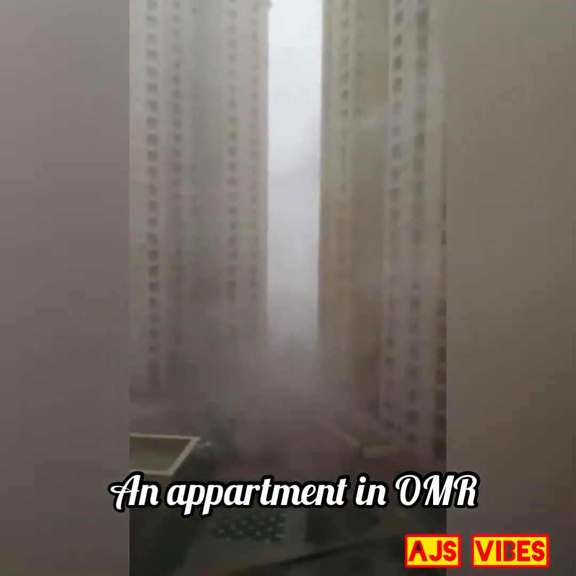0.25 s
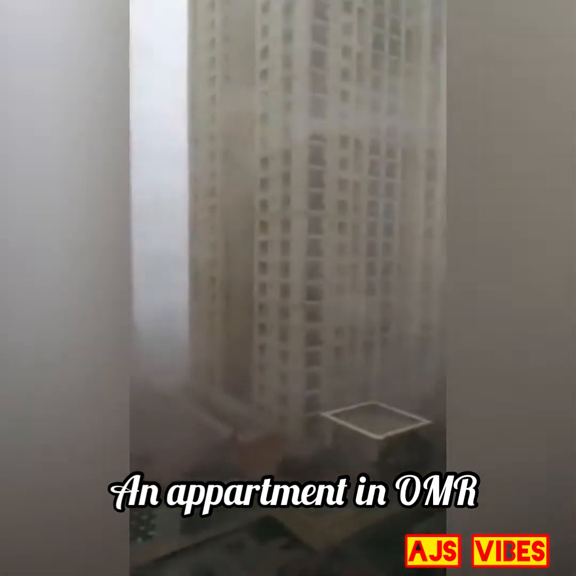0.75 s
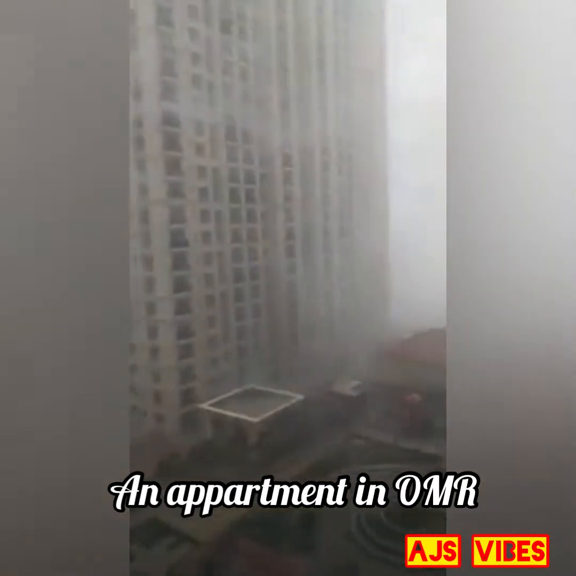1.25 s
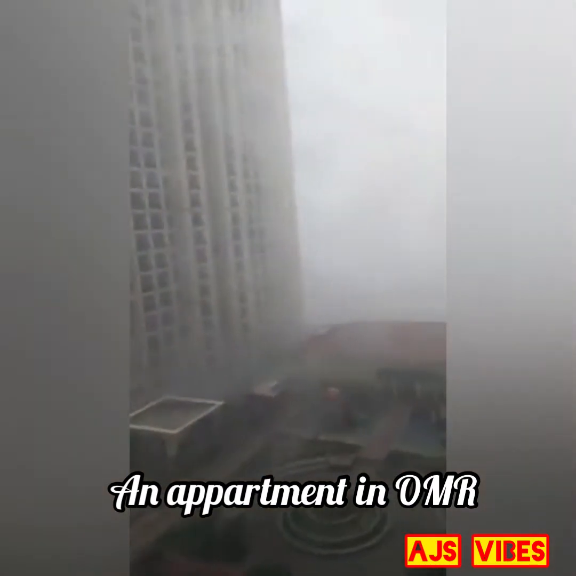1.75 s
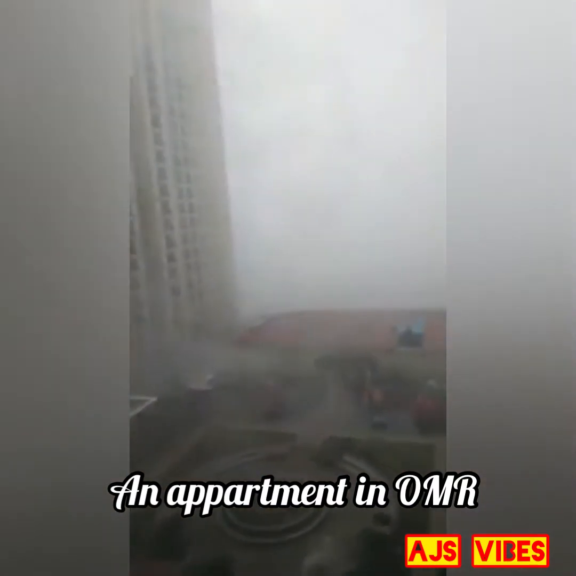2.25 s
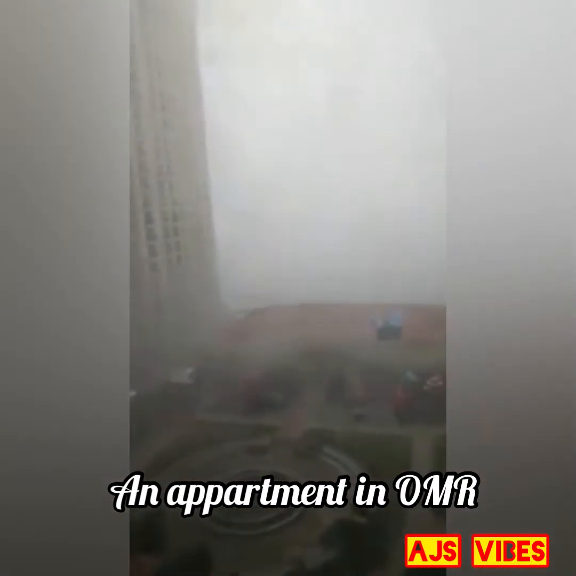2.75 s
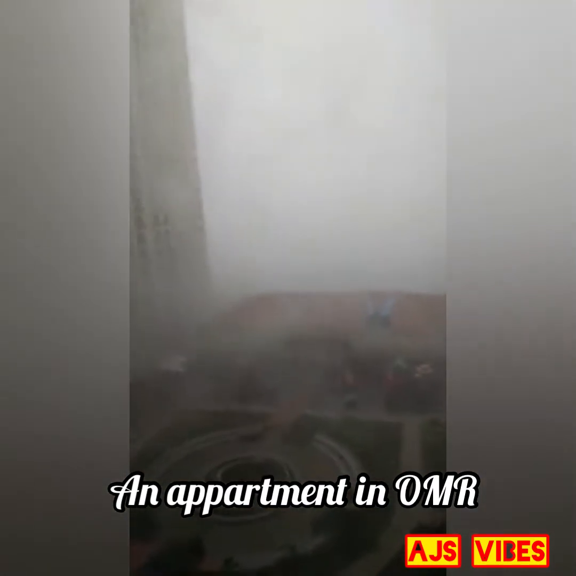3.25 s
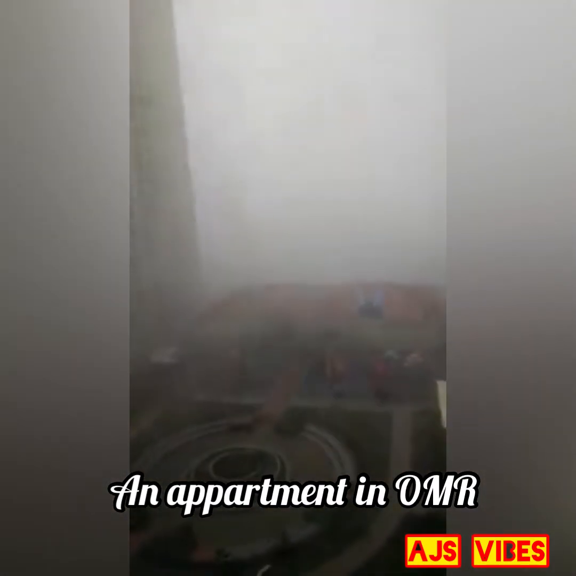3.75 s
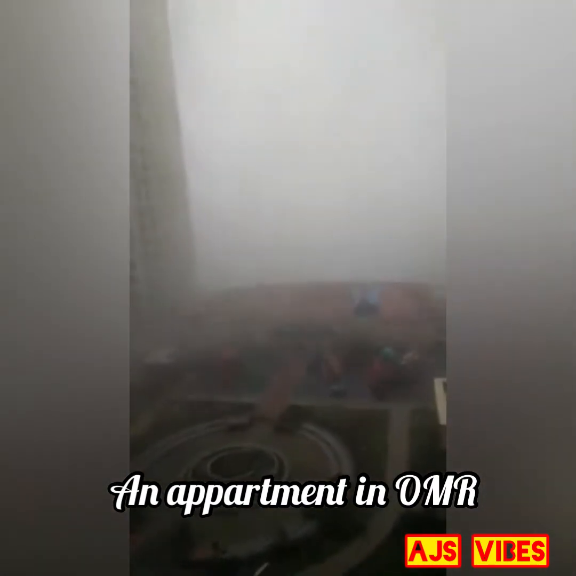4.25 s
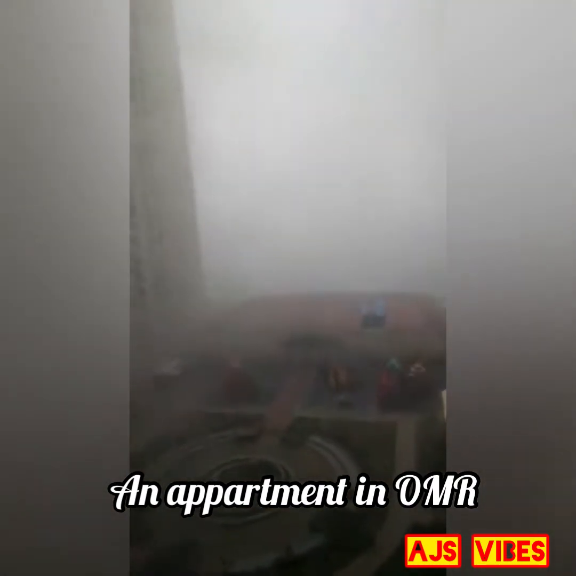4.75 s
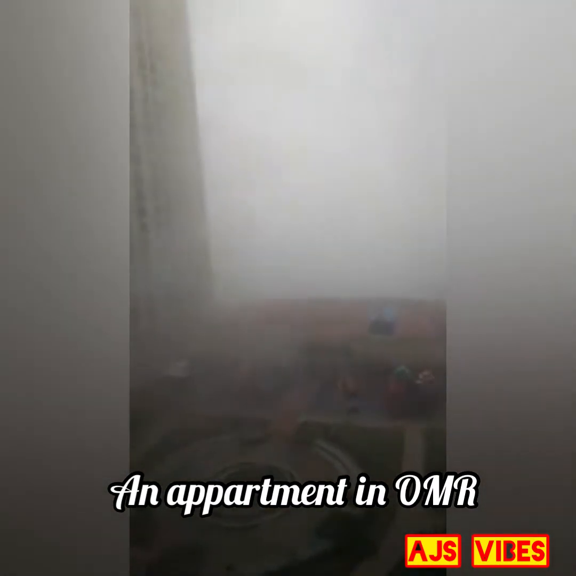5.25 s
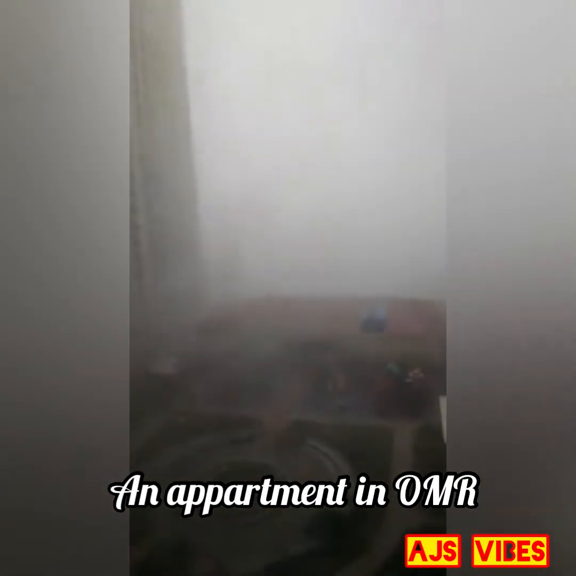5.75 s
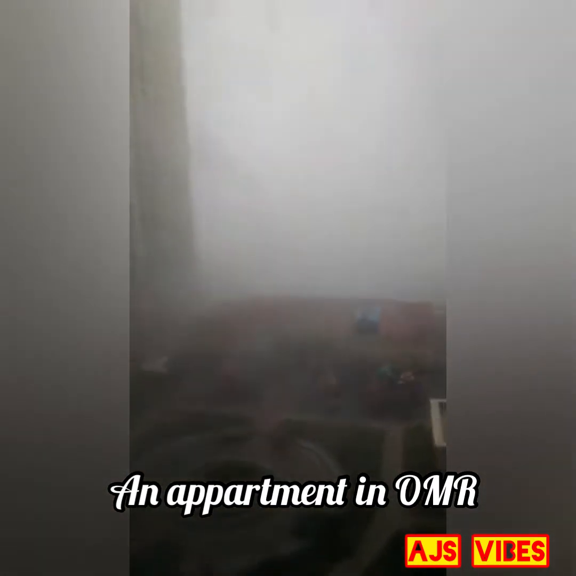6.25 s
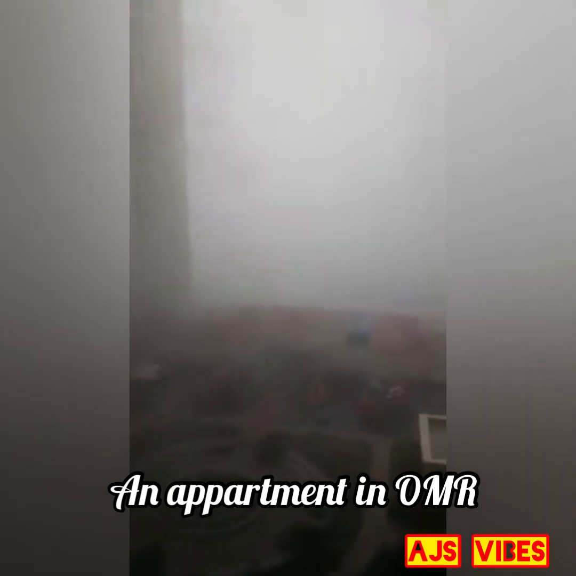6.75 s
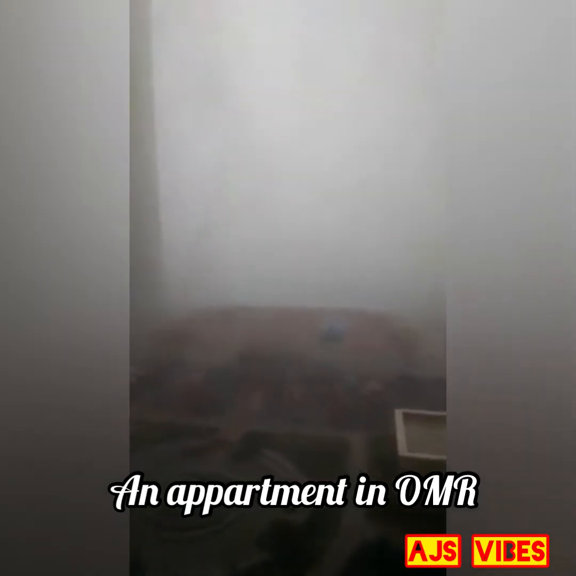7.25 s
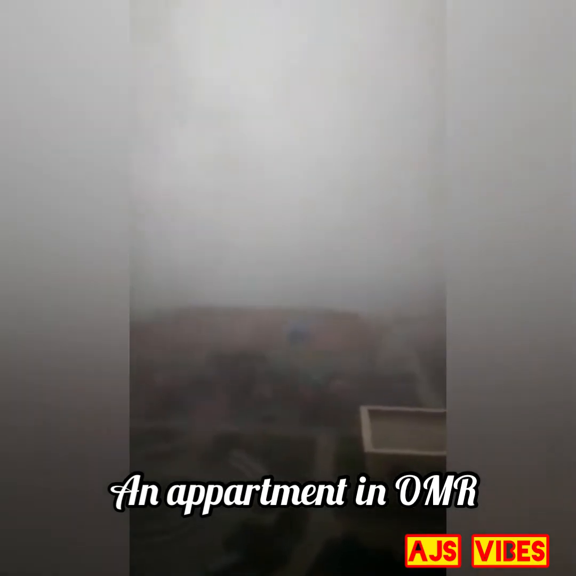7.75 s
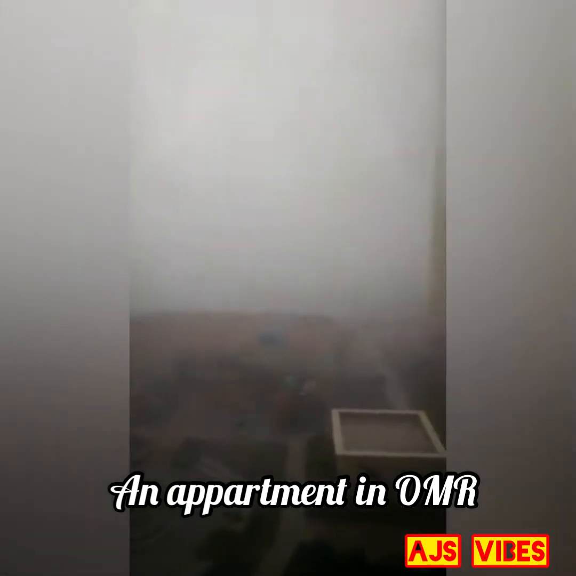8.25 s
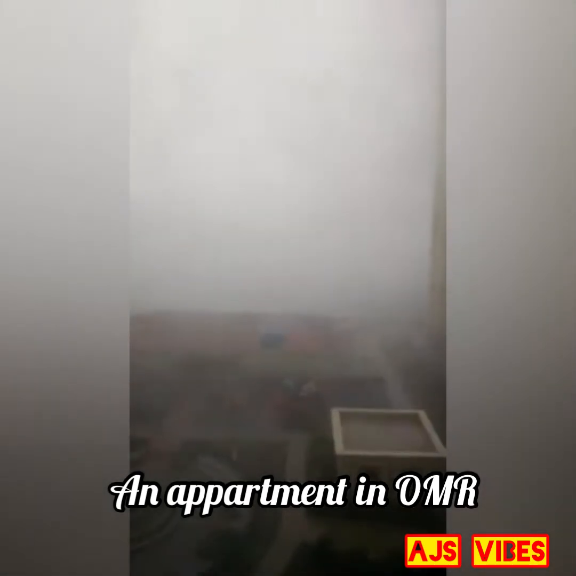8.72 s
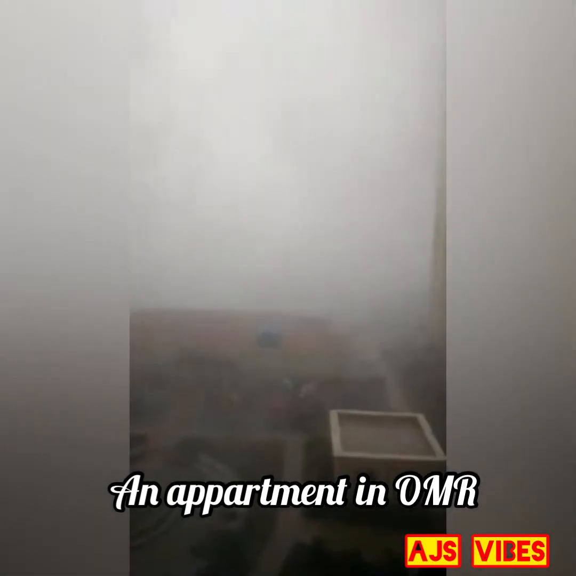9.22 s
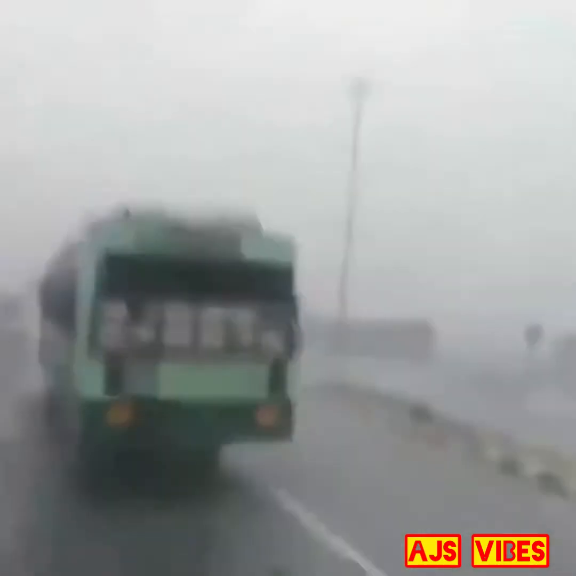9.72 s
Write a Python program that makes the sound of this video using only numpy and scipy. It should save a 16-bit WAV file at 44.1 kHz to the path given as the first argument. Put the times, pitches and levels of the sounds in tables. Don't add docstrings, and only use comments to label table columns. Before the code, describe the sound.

Dense driven rain roars and hisses around high-rise towers while wind gusts thump a phone's microphone, then a cut to a wet road fading in.

```python
import sys
import numpy as np
from scipy import signal
from scipy.fft import rfft, irfft, next_fast_len
from scipy.io import wavfile
from scipy.ndimage import uniform_filter1d

SR = 44100
rng = np.random.default_rng(int(sys.argv[2]) if len(sys.argv) > 2 else 0)


def log_audio(samples):
    frames = np.atleast_2d(samples).T
    limited = np.clip(frames, -1, 1)
    pcm = np.round(limited * 32767).astype(np.int16)
    wavfile.write(sys.argv[1], SR, pcm)


def how_loud(loudness_db):
    steps = np.asarray(loudness_db, float) / 20
    return 10 ** steps


N = 440115
FFT_SIZE = next_fast_len(N, real=True) // 2 * 2
HZ = np.arange(FFT_SIZE // 2 + 1) * SR / FFT_SIZE + 1e-3
NOTCH_HZ = 2591


def on_hz(table):
    hz, db = np.transpose(table)
    return how_loud(np.interp(np.log(HZ), np.log(hz), db))


def noise(gain):
    return irfft(rfft(rng.standard_normal(FFT_SIZE)) * gain)[:N] * np.sqrt(SR / 2)


def unit(x):
    return x / np.sqrt(np.mean(x ** 2))


def walk(rate):
    k = int(SR / rate)
    steps = np.repeat(rng.standard_normal(N // k + 1), k)
    return unit(uniform_filter1d(uniform_filter1d(steps, k), k)[:N])


def even(x, span_s):
    return x / np.sqrt(uniform_filter1d(x ** 2, int(span_s * SR)) + 1e-12)


# frequency in Hz, density in dB per Hz.
RAIN_SPECTRUM = [(20, -65.5), (50, -57), (300, -56), (600, -62), (1300, -63.5), (2000, -66.5),
                 (2650, -63.5), (4000, -69.5), (5700, -62.5), (7200, -85.5), (8150, -74), (8500, -79),
                 (13000, -88.5), (16000, -100)]
# time in seconds, level in dB.
MIST_LEVEL = [(0, -2.5), (1.3, -2.5), (1.6, 1), (2.2, -1), (2.5, 0.5), (3.0, 2), (3.3, -1), (5.0, -1),
              (5.5, 1), (5.95, 0), (6.1, 5), (6.7, 5), (7.1, 0), (9.45, -1)]


def rain(hiss_db, roar_db, bass_db):
    t = np.arange(N) / SR
    port_gap_m = 0.16
    like = np.clip(np.sinc(2 * HZ * port_gap_m / 343), -1, .9995)
    patter = how_loud(rng.exponential(size=N))
    both, apart = (rfft(unit(rng.standard_normal(N) * patter), FFT_SIZE) for _ in range(2))
    both, apart = both * np.sqrt((1 + like) / 2), apart * np.sqrt((1 - like) / 2)
    ports = np.array([both + apart, both - apart])
    colour, out, sheets = on_hz(RAIN_SPECTRUM) * np.sqrt(SR / 2), 0, walk(6)
    for hz in 22 * 2 ** np.arange(0, 10, .5):
        band = colour * np.cos(np.pi * np.clip(np.log2(HZ / hz), -.5, .5))
        low = 1 / (1 + (hz / 2200) ** 4) / (1 + (120 / hz) ** 2)
        db = hiss_db + 25.5 + (3.0 + bass_db) / (1 + (hz / 160) ** 2) + low * roar_db
        db = db + 0.65 * sheets + 0.94 * walk(15)
        db = db + (hz > 13000) * np.interp(t, *np.transpose(MIST_LEVEL))
        out = out + how_loud(db) * irfft(band * ports)[:, :N]
    return out


# frequency in Hz, density in dB per Hz.
EDDY_SPECTRUM = [(15, -36), (30, -14), (60, -16), (150, -12), (300, -17.5), (500, -17.5), (1000, -44),
                 (2000, -61), (8000, -83)]


def buffeting(level_db):
    size = np.sqrt(np.clip(how_loud(level_db) ** 2 - how_loud(-31) ** 2, 0, 1)) * how_loud(-10.5)
    lumps = how_loud(3.0 * walk(40) + 2.4 * walk(12))
    return np.array([size * unit(lumps * noise(on_hz(EDDY_SPECTRUM))) * how_loud(db) for db in (1.5, -1.5)])


# centre in seconds, level in dB, length in seconds, flutter over thump in dB.
GUST_EVENTS = [(2.441, -17, 0.018, -2), (2.523, -13.5, 0.018, -5), (2.641, -13, 0.01, -16),
               (2.717, -10, 0.012, -8), (2.834, -14, 0.028, -1), (2.884, -5, 0.016, -9),
               (2.939, -9.5, 0.021, -4), (3.105, -18, 0.023, -5.5), (3.656, -12.5, 0.053, -3.5),
               (3.728, -13.5, 0.021, 0.5), (4.067, -14, 0.024, -12), (4.507, -15, 0.02, -3.5),
               (4.55, -12.5, 0.028, -11), (4.807, -15, 0.022, -15), (4.864, -7, 0.032, -4.5),
               (5.03, -17.5, .03, -3), (6.01, -2.5, 0.024, -16), (6.062, -4, 0.031, -8),
               (6.14, -13, 0.029, -4), (6.29, -14, 0.018, -6.5), (6.599, -15, .015, -1.2),
               (7.132, -18, .02, -5), (7.42, -8.5, 0.019, -7.5), (7.94, -17, 0.024, -4.5),
               (8.102, -16, 0.04, -2), (8.56, -12, 0.013, -5), (8.625, -16, 0.017, -0.5),
               (8.876, -14, 0.045, -7), (8.947, -11, 0.019, -5), (9.367, -17, 0.031, -5)]
# frequency in Hz, density in dB per Hz.
THUMP_SPECTRUM = [(12, -36), (30, -7.5), (60, 1), (150, 1.5), (220, -16), (500, -22.5), (4000, -80)]
# frequency in Hz, density in dB per Hz.
FLUTTER_SPECTRUM = [(80, -27), (180, 0.5), (300, 2), (500, -6.5), (1000, -24), (2000, -30.5), (8000, -82.5)]


def gusts():
    thump = even(noise(on_hz(THUMP_SPECTRUM)), 0.026)
    flutter = even(noise(on_hz(FLUTTER_SPECTRUM)), 0.0057)
    out, port = np.zeros((2, N)), rng.integers(0, 2, len(GUST_EVENTS))
    for k, (s, db, length, flutter_db) in zip(port, GUST_EVENTS):
        i = np.arange(int((s - .08) * SR), int((s + 0.11) * SR))
        swell = how_loud(db) * np.exp(-((i / SR - s) / (0.95 * length)) ** 2)
        deep = np.sqrt(max(1 - how_loud(flutter_db) ** 2, .05))
        out[k, i] += swell * (deep * how_loud(-13.5) * thump[i] + how_loud(flutter_db - 2.0) * flutter[i])
    return out


# centre in seconds, left peak, right peak, half width in seconds.
SLAM_EVENTS = [
    (2.9238, 1.04, -.55, .0009),
    (6.049, 1.03, -.65, .0016),
    (8.6245, 1.04, -.8, .0008),
]


def slammed(x):
    t = np.arange(N) / SR
    for s, left, right, half_s in SLAM_EVENTS:
        push = np.exp(-((t - s) / half_s) ** 2)
        x = x * (1 - push) + push * np.array([[left], [right]])
    return x


# time in seconds, peak in dB, ring in Hz.
RATTLE_EVENTS = [(1.276, -10, 2250), (1.298, -11, 2300), (1.312, -12, 1800), (1.336, -12, 2200),
                 (1.356, -13, 1700), (1.38, -13, 2200), (1.405, -14, 1900), (1.428, -12, 1700),
                 (1.452, -12, 2300), (1.57, -9, 1400), (1.59, -11, 1700), (1.612, -11, 1500),
                 (1.584, -5.5, 850), (1.604, -4.5, 1070), (1.836, -14, 1990), (1.907, -18, 2030),
                 (1.974, -15, 2000), (2.071, -17, 1970), (2.271, -7, 1300), (2.288, -10, 1200),
                 (2.306, -7.5, 1100), (2.356, -6, 1210), (2.372, -6.5, 1000), (3.28, -13, 1980),
                 (3.539, -13, 1950), (3.548, -14, 1960), (4.841, -18, 1840), (4.838, -10.5, 760),
                 (4.849, -14, 1500)]


def rattle():
    out, t = np.zeros(N), np.arange(4000) / SR
    shake_s, rise_s = 0.013, 0.0027
    slap = signal.butter(2, [250, 3600], "bandpass", fs=SR, output="sos")
    for s, db, hz in RATTLE_EVENTS:
        blows = 0.5 + (rng.random(len(t)) < .03) * 1.4
        hits = rng.standard_normal(len(t)) * blows * np.exp(-t / shake_s) * (1 - np.exp(-t / rise_s))
        hits[130] += 3.0
        body = signal.butter(2, [hz - 480, hz + 450], "bandpass", fs=SR, output="sos")
        ring = signal.sosfilt(body, hits)
        ring = ring + 0.28 * signal.sosfilt(slap, hits)
        i = int((s - .003) * SR)
        out[i:i + len(t)] += how_loud(db - 4.5) * ring / np.abs(ring).max()
    return np.array([0.66 * out, out])


# time in seconds, peak in dB, ring in Hz.
TAP_EVENTS = [(1.284, -4.5, 2120), (1.2957, -15, 1920), (1.3007, -9.5, 2000), (1.3083, -8, 2200),
              (1.322, -5.5, 2120), (1.3327, -12.5, 2020), (1.3407, -8, 2040), (1.3619, -11, 2040),
              (1.3735, -9, 1970), (1.3855, -6.5, 2130), (1.4, -15, 2090), (1.4121, -10, 2020),
              (1.4217, -13.0, 2140), (1.4272, -15, 2190), (1.434, -9.5, 2100), (1.4458, -3.5, 2090),
              (1.4589, -10.5, 2060), (1.4684, -11, 2170), (1.4821, -13.5, 2160), (1.5746, -1.5, 2070),
              (1.5827, -12.5, 2070), (1.5941, -11, 2050), (1.6043, -10.5, 1980), (1.6131, -11, 2190),
              (1.6203, -16, 1980), (1.6291, -13.9, 2170)]
# time in seconds, peak in dB, ring in Hz.
LATE_TAP_EVENTS = [
    (1.8405, -11, 2020),
    (1.91, -13, 1950),
    (2.033, -13.5, 2100),
    (2.074, -13.5, 1950),
]


def taps():
    out, t = np.zeros(N), np.arange(1200) / SR
    peak_s = 0.0017
    shape = t / peak_s * np.exp(1 - t / peak_s)
    slap = signal.butter(3, [1100, 2900], "bandpass", fs=SR, output="sos")
    for s, db, hz in list(TAP_EVENTS) + list(LATE_TAP_EVENTS):
        ring = np.sin(2 * np.pi * (hz * t + rng.random()))
        ring = ring + unit(signal.sosfilt(slap, rng.standard_normal(len(t))))
        i = int((s - peak_s) * SR)
        out[i:i + len(t)] += how_loud(db - 13.5) * shape * ring
    return np.array([0.6 * out, out])


# time in seconds, peak in dB, frequency in Hz.
KNOCK_EVENTS = [
    (2.827, -9, 470),
    (3.2, -11, 390),
    (4.8597, 1, 480),
    (1.571, -9.5, 590),
    (1.4, -7.5, 400),
    (4.1, -24, 418),
    (6.1194, -8, 540),
]


def knocks():
    out, t = np.zeros(N), np.arange(600) / SR
    decay_s = 0.00113
    for s, db, hz in KNOCK_EVENTS:
        thud = np.sin(2 * np.pi * hz * t) * np.exp(-t / decay_s)
        i = int(s * SR)
        out[i:i + len(t)] += how_loud(db) * thud / thud.max()
    return out


# time in seconds, level in dB, lean in dB (added at the first port, taken off at the
DROP_EVENTS = [(3.2799, -27.5, 6), (3.5079, -27, 0.5), (3.5369, -22.5, 6), (3.8422, -25, 6),
               (4.1589, -26, 2), (4.358, -32, 2), (5.2779, -31, 3), (6.2316, -21.5, 9), (7.3806, -32, 3),
               (7.414, -27, 0), (7.6131, -24, 2.5), (9.202, -26.5, -2.0)]


def drops():
    out, t = np.zeros((2, N)), np.arange(500) / SR
    bright = signal.butter(2, [5600, 11000], "bandpass", fs=SR, output="sos")
    for s, db, pan_db in DROP_EVENTS:
        tick = signal.sosfilt(bright, rng.standard_normal(len(t)) * t * np.exp(-t / 0.00099))
        i = int(s * SR)
        out[:, i:i + len(t)] += how_loud(db - 3.5 + np.array([[pan_db], [-pan_db]])) * tick / np.abs(tick).max()
    return out


# time in seconds, pitch in Hz, level in dB.
WHISTLE_PATH = [(0, 6300, -39), (.2, 6300, -48), (.4, 6300, -39), (.8, 6275, -40), (1.3, 6225, -40),
                (1.5, 6220, -52), (2.2, 6220, -48), (2.4, 6220, -41), (3.0, 6215, -43), (3.5, 6150, -46),
                (4.3, 6155, -48), (5.4, 6240, -48), (6.0, 6280, -48), (6.3, 6280, -62)]


def whistle():
    s, hz, db = np.transpose(WHISTLE_PATH)
    t = np.arange(N) / SR
    level = how_loud(np.interp(t, s, db) + 3 * walk(8))
    pitch_hz = np.interp(t, s, hz) + 6 * walk(12)
    tone = level * np.sin(2 * np.pi * np.cumsum(pitch_hz) / SR)
    return np.array([0.18 * tone, tone])


# frequency in Hz, peak in dB, start in seconds, end in seconds,
# starving of the band round it in dB.
WHINE_TONES = [(700, -17, 4.515, 4.59, 0), (11437, -47, 1.57, 2.0, 4), (12187, -50, 1.3, 1.72, 11),
               (12937, -48, 2.38, 2.58, 18), (12937, -50, 5.03, 5.13, 16), (12187, -52, 4.8, 5.1, 3),
               (12187, -49, 7.15, 7.4, 3), (14062, -57, 1.45, 2.22, 20), (14062, -59, 6.25, 6.9, 10),
               (14062, -56, 6.9, 7.6, 14), (14062, -55, 7.6, 8.57, 11)]


def whine():
    t = np.arange(N) / SR
    tones = np.zeros(N)
    for hz, db, from_s, to_s, _ in WHINE_TONES:
        fade = np.clip(np.minimum(t - from_s, to_s - t) / .02, 0, 1)
        tones += how_loud(db) * np.sin(2 * np.pi * hz * t) * fade
    return np.array([0.18 * tones, tones])


# frequency in Hz, gain in dB.
PORT_TILT_GAIN = [(800, 0), (1500, 1), (2050, 13), (2650, -2.5), (3600, -3), (5800, 2.5), (7500, 16.5),
                  (8200, 7.5), (8500, 8), (15000, 10.5)]


def phone(ports):
    cancel, cancel_top_hz, lift_hz = 0.81, 5900, 393
    a = rfft(ports[0], FFT_SIZE)
    b = rfft(ports[1], FFT_SIZE) * on_hz(PORT_TILT_GAIN)
    late = cancel * np.exp(-2j * np.pi * HZ / NOTCH_HZ) / np.sqrt(1 + (HZ / cancel_top_hz) ** 4)
    lift = 1 + lift_hz / (1j * HZ + 25)
    return irfft(lift * np.array([how_loud(-1.22) * (a - late * b), b - late * a]))[:, :N]


# time in seconds, depth in dB.
DUCK_EVENTS = [(0.2, 2.5), (1.33, 3.5), (1.45, 5), (1.5, 4.5), (1.7, 3), (2.53, -1.5), (2.83, 3),
               (2.905, 7.5), (2.94, 7), (3.2, 5.5), (3.66, 4.5), (3.71, 4.5), (4.55, 4), (4.845, 7),
               (5.05, 4.5), (5.25, 2.5), (5.97, 2), (6.0, 8), (6.05, 10.5), (6.12, 9.5), (6.29, 9),
               (6.6, 6), (7.42, 2), (8.1, 1), (8.62, 4), (8.95, 4)]


def ducking(t):
    attack_s, recovery_db_per_s = 0.026, 12.5
    drops_db = [np.clip((t - s) / attack_s, 0, 1) * (db - recovery_db_per_s * (t - s)) for s, db in DUCK_EVENTS]
    return -np.clip(np.max(drops_db, axis=0), 0, None)


# low edge in Hz, high edge in Hz, extra starving in dB.
THIN_BANDS = [(2350, 2900, 3), (2900, 4800, 3.2), (4900, 5500, .5), (11000, 11800, 2), (12500, 13100, 3.5)]
NOTCH_CENTRES = (2650, 5260, 7950)
# start in seconds, end in seconds, starving in dB (negative feeds).
FIRST_NOTCH_SPELLS = [(0.0, 0.05, -5), (0.09, 0.14, 5), (0.28, 0.42, -3.5), (0.49, 0.53, -2), (0.6, 0.7, 6),
                      (0.84, 0.88, 6), (1.07, 1.16, 5), (1.3, 1.37, -4), (1.39, 1.46, 6),
                      (1.97, 2.07, -2.5), (2.16, 2.23, 6), (2.28, 2.37, -3), (2.55, 2.76, 2),
                      (3.04, 3.13, 4), (3.72, 3.81, 5), (3.85, 3.97, -3), (4.02, 4.11, 6),
                      (4.2, 4.27, -3.5), (4.32, 4.37, -3), (4.71, 4.81, 6), (5.2, 5.27, 4),
                      (5.43, 5.48, -3), (5.62, 5.76, -4.5), (5.83, 5.9, 6), (5.92, 6.01, -1.5),
                      (6.08, 6.15, -3), (6.2, 6.27, -4), (7.11, 7.17, -4), (7.22, 7.31, 3), (7.66, 7.71, 6),
                      (8.24, 8.38, 4), (8.57, 8.61, 6), (8.78, 8.87, -4.5), (8.89, 9.06, 4), (9.26, 9.4, 3)]
# start in seconds, end in seconds, starving in dB.
SECOND_NOTCH_SPELLS = [(0.19, 0.21, 6), (0.67, 0.7, 6), (0.86, 0.88, 6), (1.02, 1.04, 6), (1.37, 1.53, 6),
                       (1.72, 1.76, 6), (1.88, 1.97, 6), (2.14, 2.41, 8.2), (2.51, 2.53, 6),
                       (3.07, 3.13, 6), (3.34, 3.39, 6), (3.6, 3.65, 6), (4.32, 4.34, 6), (4.62, 4.78, 6),
                       (4.9, 5.04, 6), (5.27, 5.29, 6), (5.8, 5.83, 6), (6.27, 6.29, 6), (6.73, 6.76, 6),
                       (7.48, 7.62, 6), (7.94, 7.96, 6), (8.1, 8.13, 6), (8.31, 8.38, 6), (9.15, 9.17, 6)]
# start in seconds, end in seconds, starving in dB.
THIRD_NOTCH_SPELLS = [
    (1.62, 1.64, 7),
    (5.09, 5.11, 7),
    (5.96, 5.98, 7),
    (7.04, 7.06, 7),
    (8.22, 8.27, 8),
    (9.29, 9.33, 7),
]


def thin_out(x, band_db, line_db, rise_db, mood_db, blur_db):
    spec = signal.stft(np.array([x[0] + x[1], x[0] - x[1]]) / 2, nperseg=2048, noverlap=1024)[2]
    power = np.abs(spec) ** 2
    bins, frames = power.shape[1:]
    edges = np.unique(np.round(4 * np.cumsum(1.045 ** np.arange(60))).astype(int) // 4 * 4)
    edges = np.r_[0, edges[edges < bins]]
    widths = np.diff(np.r_[edges, bins])
    band = np.repeat(np.add.reduceat(power, edges, axis=1) / widths[:, None], widths, axis=1)

    def lines(low_hz, high_hz):
        return slice(int(low_hz * 2048 / SR), int(high_hz * 2048 / SR))

    chance = rng.standard_normal((len(edges) + 1, frames))
    chance = uniform_filter1d(chance, size=4, axis=1) * 2
    mood = mood_db * np.clip(.5 * chance[-1] + np.repeat(chance[:-1], widths, axis=0), -3, 1.6)
    reach_hz = 243
    for hz in NOTCH_CENTRES:
        mood[lines(hz - reach_hz, hz + reach_hz)] *= 0.2
    for hz, spells in zip(NOTCH_CENTRES, (FIRST_NOTCH_SPELLS, SECOND_NOTCH_SPELLS, THIRD_NOTCH_SPELLS)):
        extra_db = 2.5 * (hz > NOTCH_HZ * 1.5)
        for from_s, to_s, db in spells:
            span = slice(round(from_s * SR / 1024), round(to_s * SR / 1024) + 1)
            mood[lines(hz - reach_hz, hz + reach_hz), span] += db + extra_db

    slope = np.linspace(0, 1, bins)[:, None]
    bass = np.clip(slope * 17, 0, 1)
    mask = uniform_filter1d(power.sum(0), size=40, axis=0) * bass
    bar = mask * how_loud(2 * (mood + rise_db * slope))
    blur = np.sqrt(mask * np.clip(slope * 8, 0, 1) ** 2) * how_loud(blur_db - 2 * mood)
    spec = spec + blur * np.exp(2j * np.pi * rng.random(spec.shape))
    streak = uniform_filter1d(rng.standard_normal(spec.shape), size=3, axis=1)
    streak = uniform_filter1d(streak, size=4, axis=2) * np.sqrt(12)
    bar = bar * how_loud(2 * 3.2 * streak)
    for low_hz, high_hz, db in THIN_BANDS:
        bar[:, lines(low_hz, high_hz)] *= how_loud(2 * db)
    for hz, _, from_s, to_s, db in WHINE_TONES:
        span = slice(int(from_s * SR / 1024), int(to_s * SR / 1024))
        bar[:, lines(hz - 400, hz + 400), span] *= how_loud(2 * db)
    bar[1, lines(1064, 1575)] *= how_loud(2 * 6.5)
    bar[:, int(15760 * 2048 / SR):] = np.inf

    keep = (band > bar * how_loud(2 * band_db)) & (np.abs(spec) ** 2 > bar * how_loud(2 * line_db))
    mid, side = signal.istft(spec * keep, nperseg=2048, noverlap=1024)[1][:, :N]
    return np.array([mid + side, mid - side])


# frequency in Hz, density in dB per Hz.
RUMBLE_SPECTRUM = [(30, -48), (70, -21), (170, -2.5), (300, -14), (600, -13.5), (1000, -22), (2000, -41),
                   (8000, -86)]
# frequency in Hz, density in dB per Hz.
SPRAY_SPECTRUM = [(300, -42), (900, -4), (2500, -0.5), (5500, -2.5), (9000, -7), (15500, -10),
                  (16500, -62.5)]


def road():
    t = np.arange(N) / SR
    start_s, fade_db_per_doubling = 9.746, 4.5
    rumble_db, spray_db = -25.5, -28
    bump_s, bump_peak_db, bump_length_s = 9.938, 7.5, 0.0098
    fade = np.clip((t - start_s) / .2, 0, None) ** (fade_db_per_doubling / 6.02)
    bump_db = bump_peak_db * np.exp(-((t - bump_s) / bump_length_s) ** 2)
    rumble = how_loud(rumble_db + bump_db + 0.72 * walk(43)) * even(noise(on_hz(RUMBLE_SPECTRUM)), .05)
    spray = how_loud(spray_db) * fade ** 0.28 * unit(noise(on_hz(SPRAY_SPECTRUM)))
    return (rumble + spray) * fade


# time in seconds, rain hiss in dB, breeze on the ports in dB,
# roar over hiss in dB.
STORM_COURSE = [(0.0, -24, -31, 3.5), (0.4, -23, -30, 3), (0.801, -27, -30.5, 5), (1.199, -24.5, -32, 4),
                (1.6, -25, -47.5, 6.5), (2.0, -25, -39, 6), (2.33, -25.5, -31.5, 7), (2.7, -27.5, -22, 5),
                (3.5, -25, -23.5, 5.5), (4.1, -25.5, -29.5, 4), (4.6, -25, -27, 5), (5.6, -25.5, -30, 5),
                (6.2, -25.5, -25, 4.5), (7.1, -25.5, -28.5, 5), (7.7, -26.5, -28, 6),
                (8.2, -26.5, -23.5, 6), (8.7, -25.5, -25.5, 5.5), (9.45, -24.5, -20.5, 4)]


def scene():
    t = np.arange(N) / SR
    s, *columns = np.transpose(STORM_COURSE)
    hiss_db, breeze_db, roar_db = (np.interp(t, s, c) for c in columns)
    calm_db = -27.5
    bass_db = 0.49 * np.minimum(breeze_db - calm_db, 0)
    wash = rain(hiss_db + ducking(t), roar_db + 0.53 * walk(8), bass_db)
    wind = buffeting(breeze_db + 2.5 * walk(8)) + gusts()
    storm = phone(wash + wind + rattle() + taps() + drops()) + knocks()
    storm = 0.98 * np.tanh(storm)
    storm = thin_out(slammed(storm), band_db=-14.5, line_db=-10.0, rise_db=5.0, mood_db=2.5, blur_db=-14.0)
    storm = storm + whine() + whistle()
    change_s = 9.4378
    return storm * np.clip((change_s - t) / 0.001, 0, 1) + road()


def low_pass(x):
    return signal.sosfilt(signal.butter(12, 15750, fs=SR, output="sos"), x)


def record(dry):
    return low_pass(dry)


dry = scene()
out = record(dry)
log_audio(out)
```